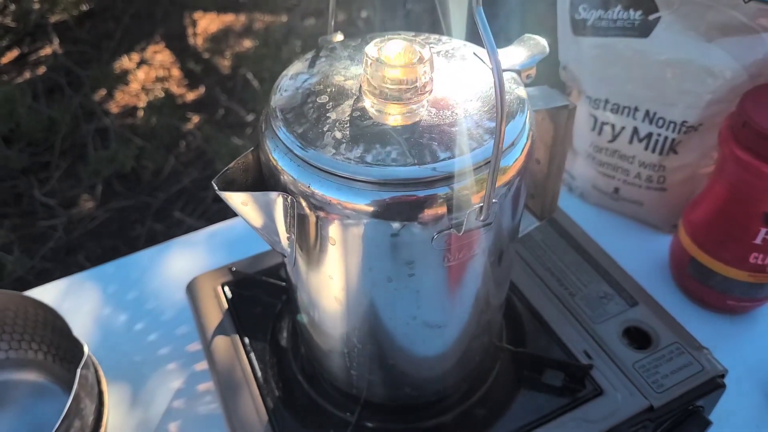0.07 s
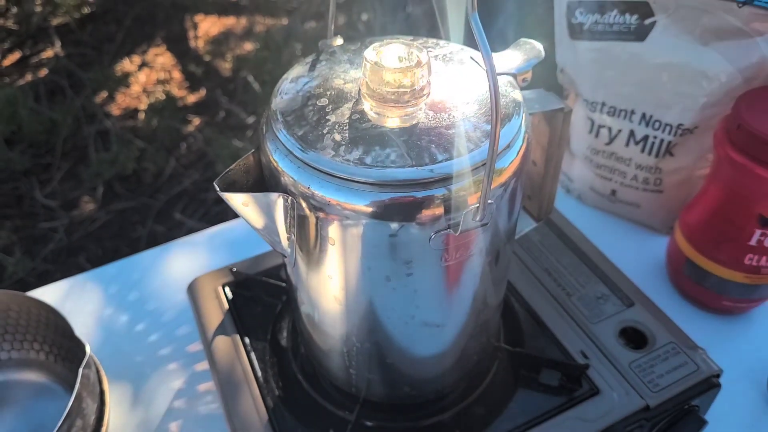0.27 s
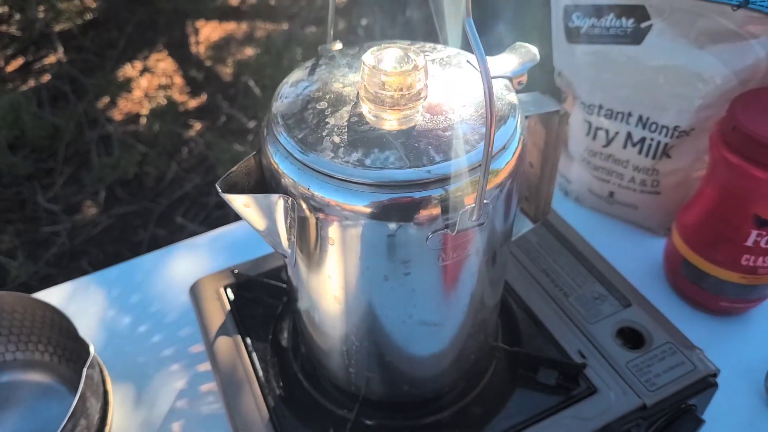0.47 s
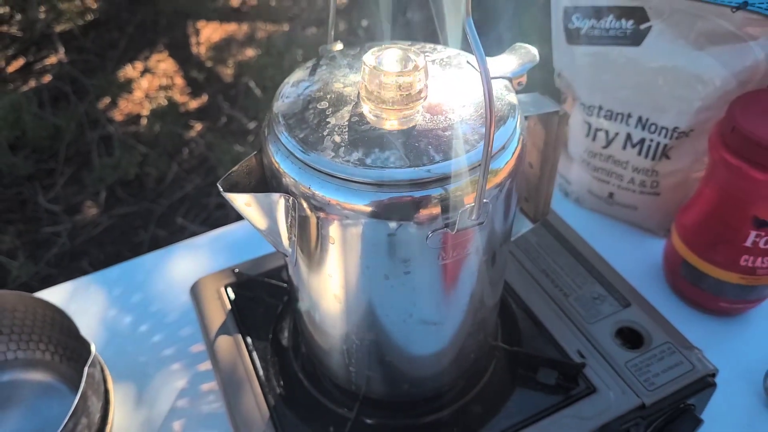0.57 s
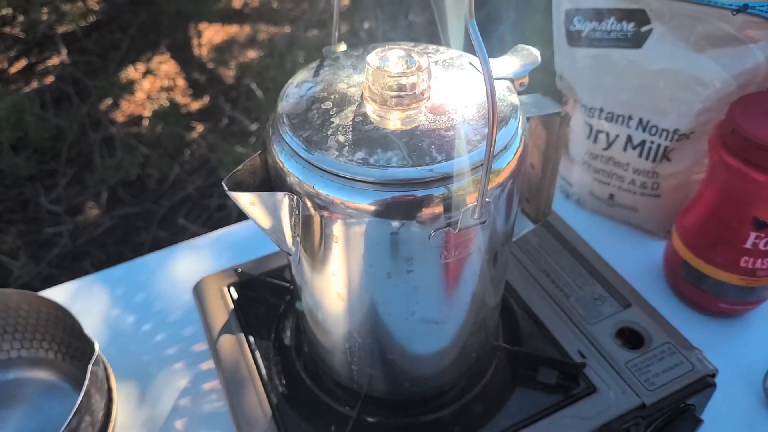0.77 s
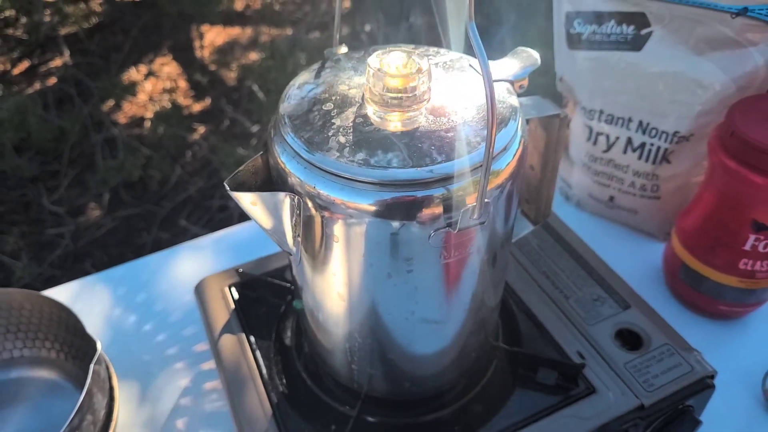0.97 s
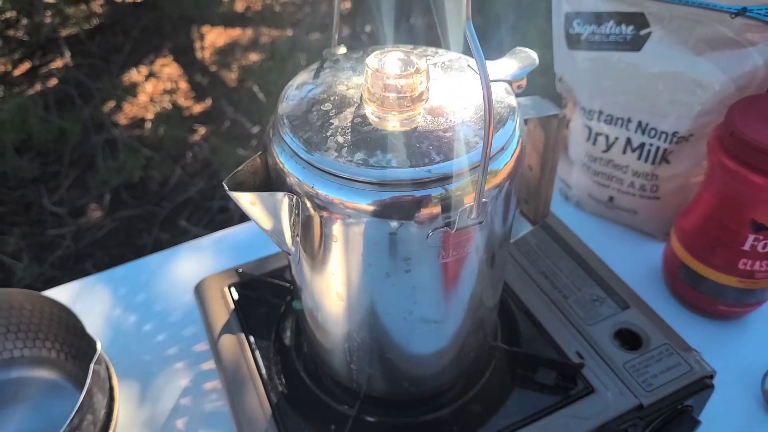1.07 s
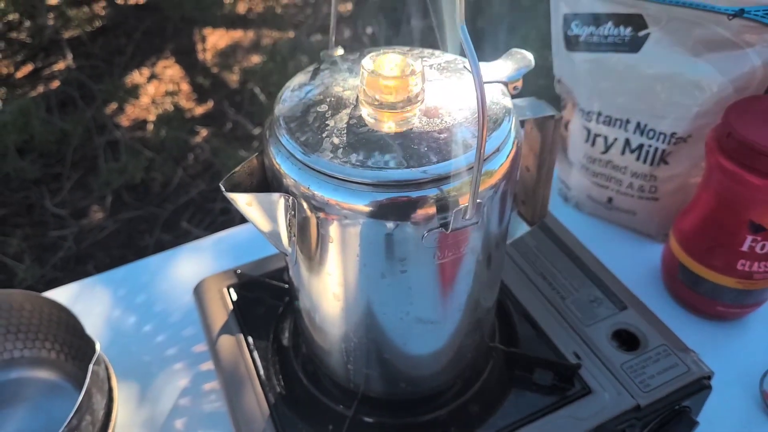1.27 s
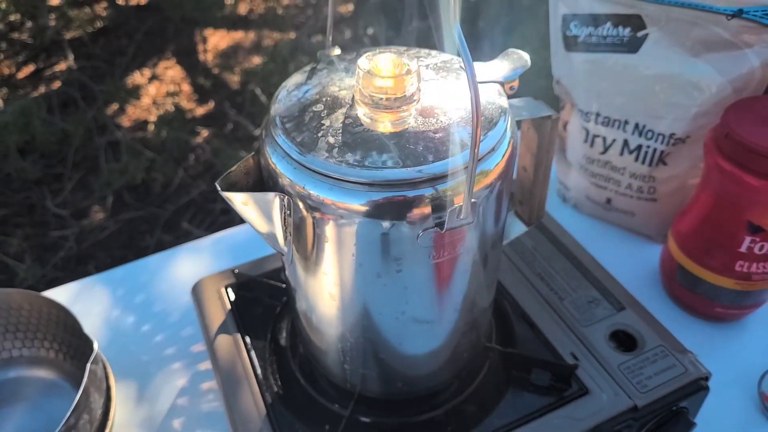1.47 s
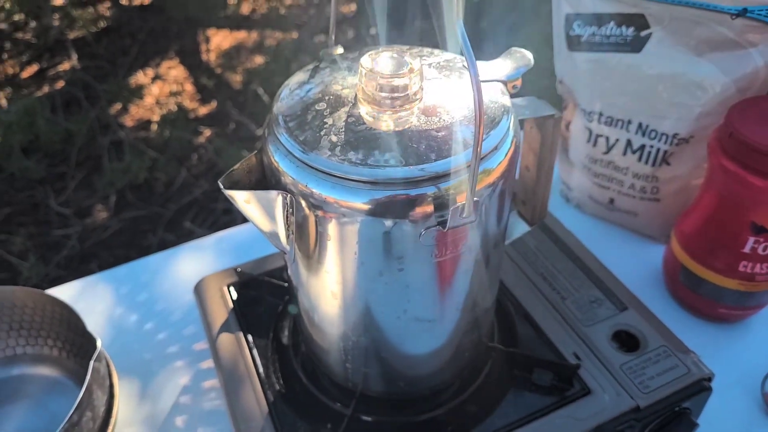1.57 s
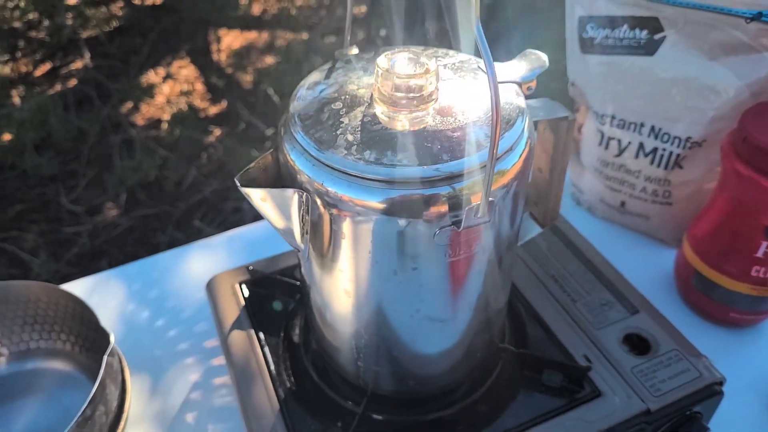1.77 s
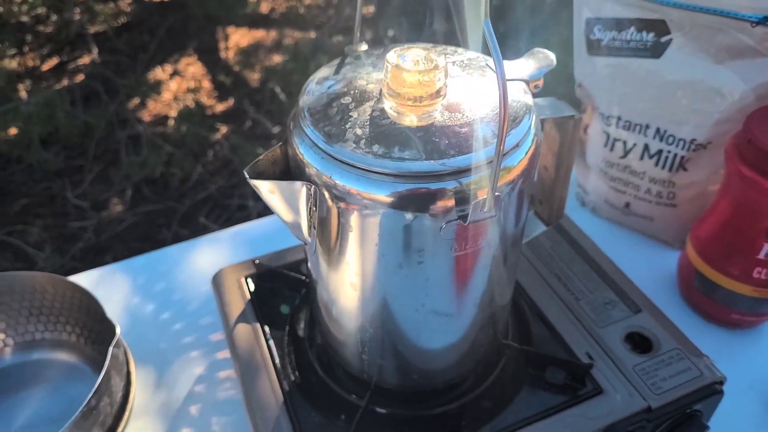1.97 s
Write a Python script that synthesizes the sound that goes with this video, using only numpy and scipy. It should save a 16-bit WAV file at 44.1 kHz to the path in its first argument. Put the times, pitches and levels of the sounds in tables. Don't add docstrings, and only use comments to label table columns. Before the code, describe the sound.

Boiling percolator bubbling and glugging in uneven bursts, with faint burner roar and soft wind thuds

```python
import sys
import numpy as np
from scipy import signal
from scipy.fft import rfft, irfft
from scipy.io import wavfile
from scipy.ndimage import uniform_filter1d, map_coordinates

SR = 44100
rng = np.random.default_rng(int(sys.argv[2]) if len(sys.argv) > 2 else 0)


def to_linear_factor(level_db):
    exponent = np.asarray(level_db, float) / 20
    return 10 ** exponent


def output_pcm(signal):
    pcm = np.clip(np.atleast_2d(signal).T, -1, 1) * 32767
    wavfile.write(sys.argv[1], SR, np.round(pcm).astype(np.int16))


N = 89258
TIME_S = np.arange(N) / SR
HALVES = np.array([[.5], [-.5]])


def unit(x):
    return x / np.sqrt(np.mean(x ** 2) + 1e-20)


def along(points, hz):
    f, value = np.transpose(points)
    return np.interp(np.log(hz + 1), np.log(f + 1), value)


def wobble(knots_per_s):
    knots = rng.standard_normal(int(N * knots_per_s / SR) + 4)
    return map_coordinates(knots, [TIME_S * knots_per_s])


def filtered(x, response):
    pad = 4096
    wide = np.pad(x, [(0, 0)] * (x.ndim - 1) + [(pad, pad)], mode="reflect")
    size = wide.shape[-1]
    spectrum = rfft(wide) * response(np.fft.rfftfreq(size, 1 / SR))
    return irfft(spectrum, size)[..., pad:pad + N]


def bubbles(rows, rise):
    s, db, hz, swell_ms = np.transpose(rows)[:, :, None]
    swell_s = swell_ms / 1000
    reach = int(3.5 * swell_s.max() * SR)
    at = np.round(s * SR).astype(int) + np.arange(-reach, reach)
    u = (at / SR - s) / swell_s
    cycles = rng.random(s.shape) + hz * swell_s * (u + rise * u * u / 2)
    wave = to_linear_factor(db) * np.exp(-u * u / 2) * np.cos(2 * np.pi * cycles)
    keep = (at >= 0) & (at < N)
    return np.bincount(at[keep], wave[keep], N)


def chug():
    pump_hz, level_db, second_db = 153.8, -24, -10.5
    end_s, fade_s = 0.061, 0.049
    turn = 2 * np.pi * pump_hz * TIME_S
    fade = (1 - np.tanh((TIME_S - end_s) / fade_s)) / 2
    pushes = np.cos(turn) + to_linear_factor(second_db) * np.cos(2 * turn)
    return to_linear_factor(level_db + 1.5 * wobble(72)) * fade * pushes


# t/s, level/dB
BOIL_STRENGTH = [(0, -42), (.07, -40), (0.201, -46.5), (.25, -42), (0.361, -49), (.44, -41), (.56, -49.5),
                 (0.641, -41), (.76, -54), (0.952, -41), (1.03, -58), (1.251, -44), (1.41, -59.5),
                 (1.472, -42), (1.57, -58.5), (1.64, -49), (1.78, -58), (1.91, -43.5)]


def boil_db():
    last_fall_db_per_s = 74.5
    s, db = np.transpose(BOIL_STRENGTH)
    return np.interp(TIME_S, s, db) - last_fall_db_per_s * np.maximum(TIME_S - s[-1], 0)


# f/Hz, width/Hz, level/dB
POT_MODES = [(86, 95, -6.5), (165, 48.3, -4), (224, 33, -2), (287, 61, -3.5), (468, 42, -21),
             (730, 150, -34)]


def pot_modes(f):
    total = 0
    for k, (centre, width, db) in enumerate(POT_MODES):
        damping = 1j * f * width
        total = total + (-1) ** k * to_linear_factor(db) * damping / (centre * centre - f * f + damping)
    return total


def swarm():
    knocks_per_s, scatter_db, level_db, wall_hz = 500, 2, 1.94, 820
    chance, sign, size = rng.random((3, N))
    sizes = to_linear_factor(-scatter_db * np.log(size + 1e-9))
    knocks = (chance < knocks_per_s / SR) * np.sign(sign - .5) * sizes
    ring = filtered(knocks, lambda f: pot_modes(f) / (1 + 1j * f / wall_hz) ** 4)
    return unit(ring) * to_linear_factor(boil_db() + level_db + 0.29 * wobble(25.06))


def splashes(count=1500):
    level_db, growth, centre_hz, log_spread, cycles = -71, 1.38, 641, 0.23, 3.62
    pitch, force = rng.standard_normal((2, count))
    s = rng.random(count) * N / SR
    boil = boil_db()
    hz = centre_hz * np.exp(log_spread * np.clip(pitch, -2, 2))
    db = level_db + growth * (boil[(s * SR).astype(int)] - boil.mean())
    db = db + 2.9 * force - 16 * np.log2(hz / centre_hz)
    swell_ms = cycles * 500 / hz
    return bubbles(np.transpose([s, db, hz, swell_ms]), rise=0.15)


# f/Hz, density/(dB per Hz)
FLAME_COLOUR = [(50, -13.5), (110, -1), (240, -3.5), (360, -9), (560, -27), (760, -26.5), (900, -48),
                (1500, -60.5)]


def flame():
    level_db, flicker_db = -48, 0.5
    roar = filtered(rng.standard_normal(N), lambda f: to_linear_factor(along(FLAME_COLOUR, f)) * (f < 2500))
    return unit(roar) * to_linear_factor(level_db + flicker_db * wobble(14.96))


# f/Hz, density/(dB per Hz)
HISS_COLOUR = [(590, -27.5), (1000, -7.5), (1200, -10.5), (1460, -11.5), (2800, -15.5), (4480, -19.5),
               (8590, -22), (13700, -11.5), (15400, -10.5)]
# f/Hz, left over right/dB
HISS_BALANCE = [(1300, 2.5), (2400, 0), (8000, -2), (14000, 3)]


def hiss():
    level_db, boil_share, patch_db = -73, .12, 0.18
    z = signal.stft(rng.standard_normal((2, N + 512)), nperseg=512)[2]
    patches = uniform_filter1d(rng.standard_normal(z.shape), 8, axis=1)
    patches = uniform_filter1d(patches, 8, axis=2)
    noise = signal.istft(z * to_linear_factor(patch_db * unit(patches)), nperseg=512)[1][:, :N]

    def colour(f):
        return to_linear_factor(along(HISS_COLOUR, f) + HALVES * along(HISS_BALANCE, f)) * (f > 600)

    boil = boil_db()
    return unit(filtered(noise, colour)) * to_linear_factor(level_db + boil_share * (boil - boil.mean()))


# f/Hz, density/(dB per Hz)
WIND_COLOUR = [(20, -17), (35, -6.5), (55, 9.5), (80, -2), (130, -9.5), (300, -28.5), (900, -61.5),
               (2500, -102)]


def wind_colour(f):
    return to_linear_factor(along(WIND_COLOUR, f))


# t/s, level/dB
WIND_SWELL = [
    (0, 3.5),
    (.5, 2.5),
    (.8, -5),
    (.94, 0),
    (1.03, -4),
    (1.401, -0.5),
    (1.6, 0.5),
    (1.9, 3.5),
    (2.02, 8),
]


def breeze():
    level_db, left_db = -50, -10
    lumps = to_linear_factor(3 * np.array([wobble(12), wobble(12)]))
    swell = to_linear_factor(np.interp(TIME_S, *np.transpose(WIND_SWELL)))
    rumble = unit(filtered(rng.standard_normal((2, N)), wind_colour)) * lumps * swell
    return to_linear_factor(level_db) * rumble * to_linear_factor([[left_db], [0]])


# t/s, level/dB (peak), f/Hz, swell/ms
LID_SPURTS = [(0.013, -36, 499, 2.2), (0.048, -41, 476, 3.2), (0.059, -39.5, 443, 1.5),
              (0.064, -48, 678, 7.9), (0.066, -43, 467, 8.2), (0.075, -43, 498, 1.9),
              (0.114, -42.5, 497, 1.4), (0.121, -45.5, 498, 2.5), (0.145, -50.5, 423, 8.8),
              (0.161, -46, 473, 2.1), (0.226, -47, 520, 1.5), (0.232, -44, 526, 1.7),
              (0.266, -47.0, 489, 9.8), (0.291, -38.5, 460, 1.5), (0.418, -44, 520, 1.7),
              (0.421, -45.5, 429, 11), (0.422, -49, 710, 2), (0.426, -37, 526, 1.6), (0.433, -54, 680, 3),
              (0.434, -36.5, 487, 1.7), (0.45, -35.5, 498, 1.5), (0.454, -46.0, 498, 1.9),
              (0.535, -42.5, 467, 1.6), (0.587, -44, 498, 1.9), (0.592, -49.5, 544, 1.8),
              (0.61, -38.5, 526, 1.5), (0.616, -44, 504, 1.6), (0.654, -54, 537, 3.3),
              (0.669, -53, 620, 2.2), (0.671, -45, 476, 1.5), (0.695, -51, 449, 2.7), (0.848, -50, 498, 5),
              (0.901, -51, 466, 21), (0.952, -50, 455, 9.0), (0.953, -46.5, 577, 5.6),
              (0.972, -49, 536, 1.9), (1.176, -44, 446, 5.7), (1.203, -47.5, 490, 2.3),
              (1.218, -47.5, 500, 1.2), (1.231, -52, 493, 2.7), (1.263, -55, 595, 6.8),
              (1.285, -45.5, 460, 1.6), (1.453, -43.5, 500, 2.7), (1.475, -46, 557, 2.7),
              (1.492, -46.5, 507, 2.4), (1.631, -45.5, 520, 2.2), (1.646, -55, 640, 2.5),
              (1.649, -43.5, 460, 2.8), (1.874, -50.5, 450, 8), (1.918, -50, 450, 9.5)]


def spurts():
    return bubbles(LID_SPURTS, rise=.04)


# t/s, level/dB (peak), f/Hz, swell/ms
STEAM_GLUGS = [(0.023, -31.5, 303.3, 5.3), (0.062, -25.5, 190, 3.8), (0.075, -39.5, 192, 24),
               (0.076, -35, 253, 15.0), (0.131, -37.5, 217, 22.0), (0.151, -40.5, 192.0, 19),
               (0.161, -33.5, 267, 8.8), (0.23, -36, 234, 7.0), (0.269, -37, 122.5, 22.0),
               (0.272, -39.5, 153.3, 42), (0.284, -38, 217.3, 18), (0.344, -44, 128.0, 41),
               (0.344, -44.5, 242, 27), (0.436, -50, 157.0, 13), (0.439, -40, 222.3, 22.0),
               (0.447, -43, 277, 15), (0.487, -45.5, 234, 10), (0.509, -40, 232, 2.4),
               (0.527, -33.5, 143.5, 4.1), (0.588, -39, 144, 16), (0.588, -35, 270.0, 4.5),
               (0.612, -25.5, 182, 3.54), (0.635, -35, 171, 3.9), (0.644, -38.5, 218, 15.0),
               (0.652, -38, 144.7, 26), (0.675, -32, 198, 5.1), (0.84, -33, 248, 4.3),
               (0.843, -37.0, 160.4, 7.9), (0.883, -29, 204, 2.5), (0.898, -34.5, 173.4, 12),
               (0.94, -34.5, 162.5, 10.0), (0.946, -44, 272.6, 12), (0.985, -36.5, 219.5, 17),
               (0.993, -35.5, 218, 4.0), (1.068, -40.5, 164, 19), (1.176, -34, 228, 3.7),
               (1.223, -43, 127, 12), (1.264, -36.5, 151, 12), (1.292, -40, 247, 7.3),
               (1.388, -31, 190, 1.7), (1.471, -38.5, 144, 10.0), (1.496, -36.5, 195, 7.9),
               (1.626, -41, 221, 7.6), (1.654, -40, 163, 13.5), (1.691, -37.5, 233.6, 22.0),
               (1.918, -34, 137.0, 9.1), (1.933, -37.5, 216, 17.8), (1.945, -44.5, 262, 10.8),
               (1.951, -34.5, 224, 3.5)]


def glugs():
    return bubbles(STEAM_GLUGS, rise=.04)


# t/s, level/dB (peak), f/Hz, swell/ms
LID_TICKS = [(.05, -59, 900, 1.5), (.066, -71, 2300, 3), (0.075, -51, 890, 1.4), (.11, -62, 890, 1.3),
             (0.139, -68, 950, 1.4), (.158, -62, 900, 1.3), (.224, -54, 890, 0.4), (.462, -59, 950, 1.1),
             (.51, -47, 520, 1.7), (.841, -57, 515, 2), (.889, -49, 573, 2.1), (.955, -75, 1300, 2),
             (1.449, -67, 750, 0.6), (1.631, -71, 1100, 3.2), (1.826, -68, 700, 6.3),
             (1.862, -53.5, 547, 4.3)]


def ticks():
    return bubbles(LID_TICKS, rise=.04)


# t/s, level/dB (peak), f/Hz, swell/ms
COLUMN_SURGES = [(0.051, -40.5, 70.5, 5.5), (0.084, -56, 97, 9.2), (0.278, -41.5, 77, 9.2),
                 (0.46, -46, 54.8, 25), (0.534, -44.5, 94.7, 36), (0.613, -35.5, 83.4, 3.6),
                 (0.661, -37.5, 87.9, 23), (0.863, -39.5, 92.3, 13), (0.942, -34.5, 90, 7.9),
                 (1.253, -33, 78.4, 7.9), (1.848, -39, 95, 9.9), (1.93, -39, 92.2, 11)]


def surges():
    return bubbles(COLUMN_SURGES, rise=.04)


# t/s, level/dB (peak), f/Hz, swell/ms
PORT_EDDIES = [(0.057, -26, 53.7, 13), (0.19, -43.5, 56, 55), (0.329, -32, 60.7, 8),
               (0.395, -32.5, 74, 8.8), (0.427, -40.5, 33, 31), (0.432, -28.5, 56, 12), (0.497, -36, 61, 6),
               (1.254, -36.5, 73, 3.4), (1.684, -34.5, 53, 27.5), (1.761, -43, 56, 17),
               (1.824, -29.5, 65, 9.7), (1.864, -34, 66, 14), (1.918, -37.5, 56.6, 100),
               (2.0, -26.5, 43.8, 8.3)]


def eddies():
    slap_db, left_share = -9.5, .12
    thuds = bubbles(PORT_EDDIES, rise=-0.21)
    power = uniform_filter1d(uniform_filter1d(thuds ** 2, size=500), size=500)
    rough = unit(filtered(rng.standard_normal(N), lambda f: wind_colour(f) * f))
    slap = np.sqrt(np.abs(power)) * rough
    return [[left_share], [1]] * (thuds + to_linear_factor(slap_db) * slap)


# f/Hz, left over right/dB
POT_BALANCE = [(80, 2), (200, 4), (400, 5), (750, 12)]


def pot():
    lead_s, scatter_db, scatter_from_hz, decay_s = 0.00025, -7, 510, 0.021
    mono = chug() + swarm() + splashes() + flame() + spurts() + glugs() + ticks() + surges()

    def place(f):
        balance_db = along(POT_BALANCE, f)
        return to_linear_factor(HALVES * balance_db - balance_db / 2) * np.exp(2j * np.pi * f * HALVES * lead_s)

    direct = filtered(mono, place)
    length = SR // 10
    tails = rng.standard_normal((2, length)) * to_linear_factor(-60 * np.arange(length) / SR / decay_s)
    tails = tails / np.linalg.norm(tails[0])
    earlier = np.pad(direct, [(0, 0), (length, 0)], mode="reflect")
    echoes = signal.fftconvolve(earlier, tails, axes=1)[:, length:length + N]
    scatter = filtered(echoes, lambda f: f * f / (f * f + scatter_from_hz ** 2))
    return direct + to_linear_factor(scatter_db) * scatter


def soft_edge(n, low):
    return low + (1 - low) * np.sin(np.pi / 2 * np.minimum(n / 200, 1)) ** 2


def scene():
    n = np.arange(N)
    return (pot() + breeze() + eddies() + hiss()) * soft_edge(n, .5) * soft_edge(n[::-1], .25)


def low_pass(x):
    return signal.sosfilt(signal.butter(12, 15500, fs=SR, output="sos"), x)


def record(dry):
    return low_pass(dry)


dry = scene()
out = record(dry)
output_pcm(out)
```